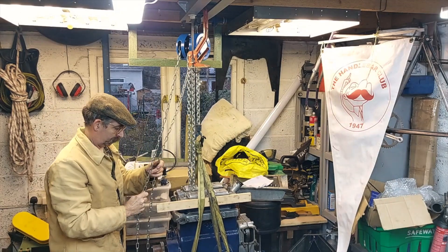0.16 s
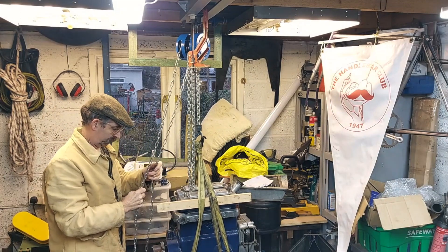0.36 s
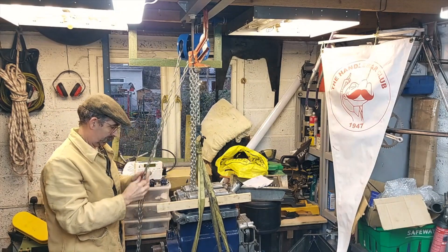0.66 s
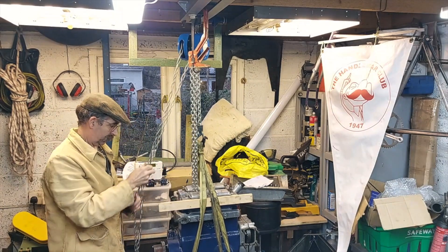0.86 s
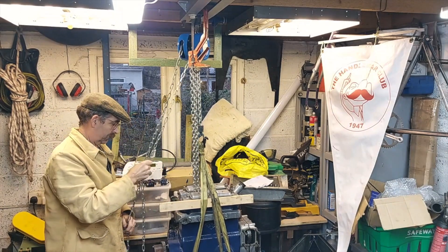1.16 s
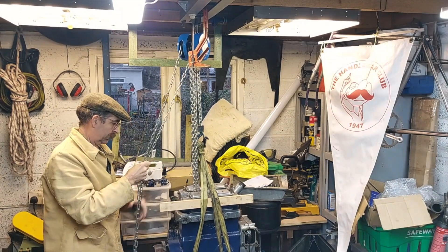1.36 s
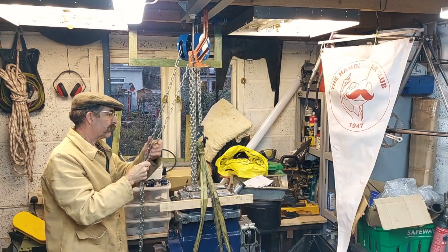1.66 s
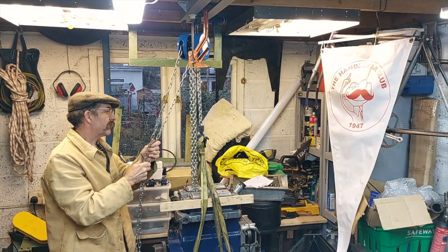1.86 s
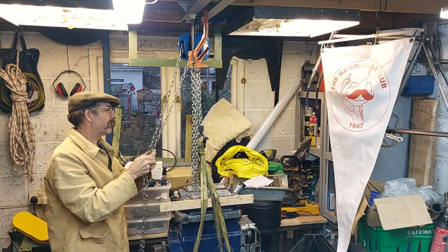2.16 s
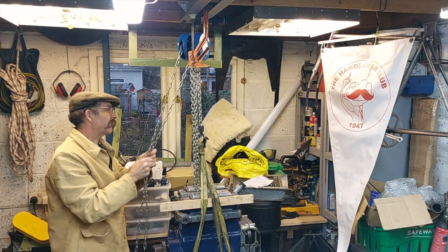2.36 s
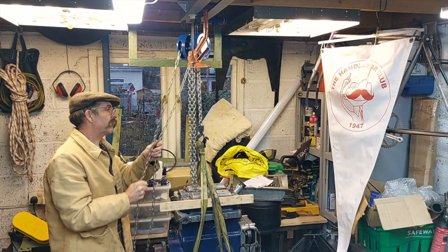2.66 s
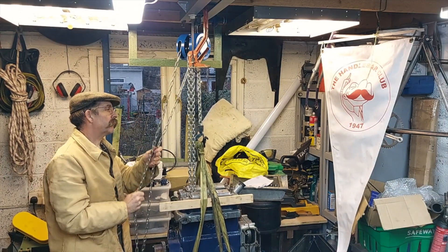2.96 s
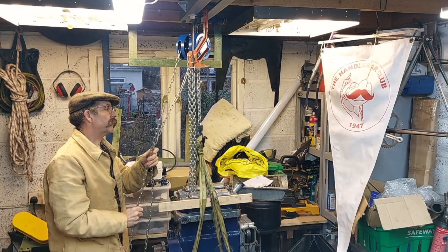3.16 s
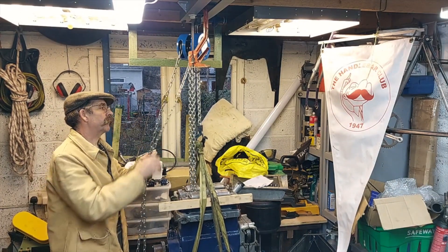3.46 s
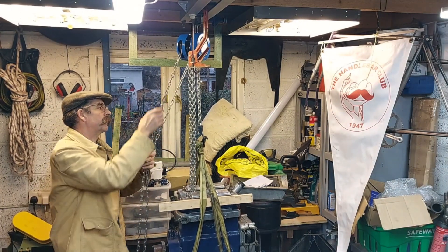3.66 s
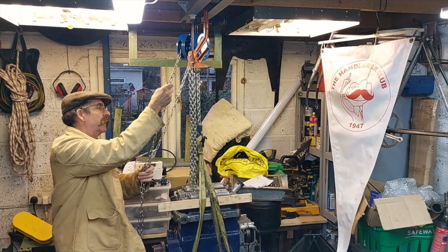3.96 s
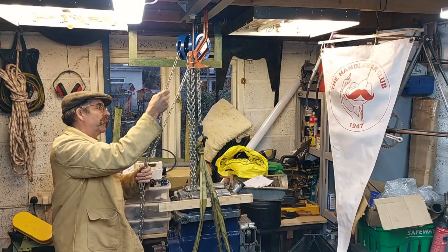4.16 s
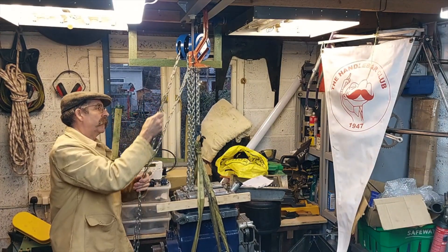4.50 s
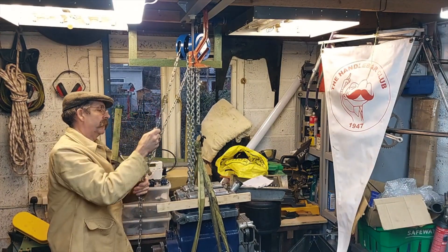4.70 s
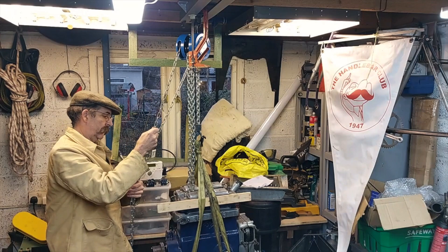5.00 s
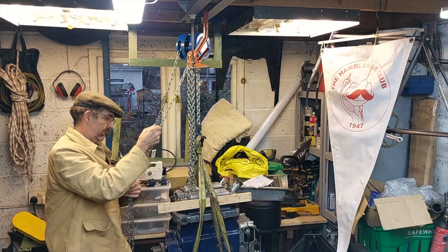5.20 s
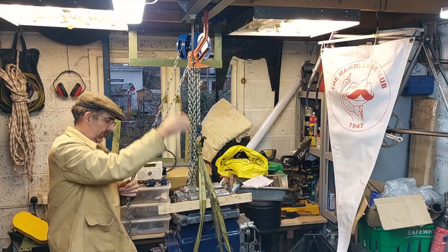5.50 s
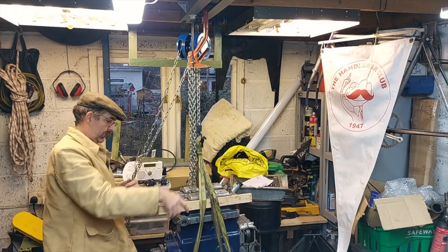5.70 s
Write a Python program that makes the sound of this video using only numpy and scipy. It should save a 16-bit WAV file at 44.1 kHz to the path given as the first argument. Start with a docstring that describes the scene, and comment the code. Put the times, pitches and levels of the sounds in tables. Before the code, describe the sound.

A hand chain is hauled through a hoist in a small garage, clattering and ratcheting in uneven bursts with metallic jingles and quiet gaps between.

```python
"""Chain hoist in a small garage

A hand chain is hauled through a chain hoist in a small, cluttered garage.
In each pull a pawl snaps over its ratchet while links knock on the wheel and its steel housing: these are
short bursts of noise sent through the ringing tones (modes) of the steel. Links rattle and ping; links and
sleeve or zip tick. Under this are the rumble of the beam, a shuffle, a rustling sleeve and still air, all
shaped noise. Delayed noise echoes give the room."""
import sys
import numpy as np
from scipy import signal
from scipy.fft import rfft, irfft
from scipy.io import wavfile
from scipy.ndimage import uniform_filter1d

SR = 44100
rng = np.random.default_rng(int(sys.argv[2]) if len(sys.argv) > 2 else 0)


def materialize(psi):
    """Save the field psi as 16-bit PCM at rate SR to the path in sys.argv[1].

    A 1-D psi becomes a single channel; in a 2-D psi each row is a channel.
    """
    bounded = np.clip(np.atleast_2d(psi).T, -1, 1)
    quanta = np.round(bounded * 32767).astype(np.int16)
    wavfile.write(sys.argv[1], SR, quanta)


N = 257544  # length in samples
TIME = np.arange(N) / SR
AGE = np.arange(SR // 4) / SR  # seconds since a blow
EDGE_HZ = 15750  # upper limit of the sound

# Levels in the tables are relative: each source also has an overall level of its own.
# Pulls that turn the wheel; a short tug moves it by one tooth:
# [start t/s, end t/s, pawl level/dB, rattle level/dB, beam level/dB]
PULLS = [(0.0004, 0.016, -5.5, -16.5, -26), (0.285, 0.305, -10, -24.5, -24.5),
         (0.659, 1.045, -10, -15.5, -28.5), (2.002, 2.001, -1.5, -6.5, -29),
         (2.398, 2.703, -4.5, -13.5, -32), (2.92, 3.098, -5, -12, -29), (4.1475, 4.196, -7.5, -21.5, -33),
         (4.2822, 4.712, -8, -19, -30.5)]
# Links that knock on the wheel or its guard: [t/s, clank level/dB, thud level/dB, jingle level/dB]
KNOCKS = [(0.001, -15.5, -20, -28), (0.076, -17.5, -43, -20), (0.111, -22, -57, -26.5),
          (0.275, -19, -36, -27.5), (0.29, -7, -41, -13), (0.463, -20.5, -62, -25.5),
          (0.497, -23, -48, -26), (0.555, -10, -18, -22), (0.586, -10.5, -44, -15.5),
          (0.605, -4.5, -47, -13.5), (0.663, -0.5, -11, -11), (0.698, -1, -12, -17.5),
          (0.738, -0.5, -12, -5.5), (0.784, -1.5, -12.5, -10), (0.823, -1.5, -40, -7),
          (0.864, -1.5, -9.5, -12), (0.9, -6.5, -39, -15), (0.942, -18, -45, -10), (0.964, -7.5, -27, -11),
          (0.981, -9, -31, -33), (1.014, -6, -20, -25), (1.044, -21, -13, -7), (1.065, -6, -11, -15),
          (1.181, -12.5, -30, -20), (1.29, -17.5, -58, -24.5), (1.4, -24.5, -44, -38.5),
          (1.472, -12, -33, -15.5), (1.552, -12, -37, -18.5), (1.571, -13.5, -39, -20.5),
          (1.648, -28, -27.5, -36.5), (1.906, -24, -30, -47), (1.96, -17.5, -20, -34),
          (1.995, -27, -18.5, -14.5), (2.045, -11, -17.5, -17.5), (2.071, -8, -15.5, -15.5),
          (2.139, -12.5, -27.5, -18.5), (2.31, -23, -30.5, -35.5), (2.376, -14.5, -31, -28),
          (2.418, -9, -11.5, -7), (2.453, -0.5, -12.5, -23), (2.516, -4.5, -13.5, -9.5),
          (2.573, -6, -36, -15), (2.634, -11, -12.5, -10), (2.68, -6, -18, -12.5), (2.779, -12.5, -31, -21),
          (2.857, -16.5, -69, -19.5), (2.924, -15, -19, -24), (2.955, -19, -36, -14),
          (2.97, -3.5, -35, -28), (2.986, -22, -23, -29), (3.023, -20, -34, -13), (3.042, -6, -11, -35),
          (3.076, -1.5, -17.5, -22), (3.178, -15, -45, -27.5), (3.229, -19.5, -41, -26),
          (3.26, -5.5, -28, -17.5), (3.281, -8, -17.5, -16), (3.349, -17, -44, -21.5),
          (3.386, -9, -36, -15), (3.57, -9.5, -18.5, -26.5), (3.633, -10.5, -25, -16),
          (3.821, -10.5, -29.5, -14.5), (3.86, -23, -31, -23.5), (3.9533, -21.5, -29.5, -47),
          (3.988, -33, -27, -40), (4.029, -12.5, -38, -22), (4.079, -15.5, -46, -30),
          (4.127, -12, -37, -21), (4.199, -6.5, -50, -10.5), (4.219, -10, -40, -10.5),
          (4.229, -9.5, -10, -34), (4.284, -8.5, -26, -12.5), (4.327, -8, -14, -37),
          (4.342, -8, -36, -10.5), (4.358, -6.5, -17, -21), (4.394, -23, -13, -20), (4.425, -2.5, -31, -12),
          (4.444, -16, -12, -13.5), (4.485, -3.5, -51, -17.5), (4.54, -6.5, -21, -17),
          (4.573, -5.5, -21, -9.5), (4.611, 0, -13.5, -13), (4.654, -9, -16, -16), (4.742, -7, -22.5, -18),
          (4.859, -17, -27.5, -21.5), (4.955, -47, -55, -32.5), (5.059, -19, -22, -28),
          (5.194, -24.5, -48, -33.5), (5.343, -26, -34, -31.5)]


def pawl(gather_s=0.007, uneven_s=0.001, uneven_db=1.66, uneven_top_db=3, teeth_per_s=22):
    """In each pull the pawl snaps down bright and hard on tooth after tooth; the wheel gathers a little speed."""
    # Tone colour of a snap: [f/Hz, level/dB]
    pawl_colour = [(300, -1), (1500, -2.5), (3000, -9), (5500, -6), (8000, -2), (11000, 0.5), (13500, -3.5),
                   (16000, -6)]
    out = np.zeros(N)
    for start, end, db, _, _ in PULLS:
        duration = end - start
        for progress in np.linspace(0, 1, 1 + round(abs(duration) * teeth_per_s)):
            late, harder, brighter = rng.uniform(-np.sqrt(3), np.sqrt(3), 3)
            tilt_db = uneven_top_db * brighter
            colour = causal([(hz, level + tilt_db * hz / EDGE_HZ) for hz, level in pawl_colour])
            snap = ring(contact(colour, rise=0.0016, fall=0.009), ring_db=3.5, link_db=-2.5)
            delay = (gather_s + uneven_s * late) * np.sin(np.pi * progress)  # most in mid-pull
            add(out, start + progress * duration + delay, amp(db + uneven_db * harder) * snap)
    return amp(-6.5) * out


def knocks(soft_top_hz=4000, hardening_hz=23000):
    """Links hit the housing: each blow is split into a low thud, a middle clank and a high jingle."""
    # Tone colour of a knock: [f/Hz, level/dB]
    knock_colour = [(100, -33), (260, -13.5), (390, -2.5), (620, -3), (1000, -1.5), (1700, -2),
                    (2050, -9.5), (3500, -12.5), (6000, -13.5), (9300, -15.5), (11000, -19.5), (13000, -14),
                    (16000, -40)]
    out, colour = np.zeros(N), causal(knock_colour)
    registers = [([750, 2200], "bandpass"), (750, "lowpass"), (2200, "highpass")]
    filters = [signal.butter(3, hz, kind, fs=SR, output="sos") for hz, kind in registers]
    for s, clank_db, thud_db, jingle_db in KNOCKS:
        seating_s = 0.00017 + 0.0037 * amp(clank_db)  # a link under load grinds for longer into its pocket
        blow = ring(contact(colour, rise=seating_s, fall=0.008), ring_db=2, link_db=6)
        # gentle touches are duller
        top_hz = np.clip(soft_top_hz + hardening_hz * np.sqrt(amp(jingle_db)), SR / 20, SR / 2 - 1)
        blow = signal.sosfilt(signal.butter(2, top_hz, fs=SR, output="sos"), blow)
        clank, thud, jingle = (unit_blow(signal.sosfilt(sos, blow)) for sos in filters)
        knock = amp(clank_db - 7.5) * clank + amp(thud_db) * thud + amp(jingle_db - 5) * jingle
        add(out, s, knock)
    return out


def rattle(per_s=380, spread_db=5.0, bright_db=-15):
    """Many small random touches between links: a dull mutter when slack, bright when the chain runs."""
    # Tone colour of a touch: [f/Hz, level/dB]
    rattle_colour = [(100, -23), (250, -4), (380, -0.5), (650, -0.5), (1000, -8), (1700, -7.5),
                     (2200, -10.5), (5000, -11.5), (10000, -19), (16000, -17)]
    # a faint mutter runs on its own and fades from 4.2 s
    vigour = amp(-36.5) * stroke(0, 4.2, attack_s=0.01, release_db_per_s=21)
    for start, end, db, _ in movements():
        movement = amp(db) * stroke(start, end, attack_s=0.0074, release_db_per_s=191)
        vigour = np.hypot(vigour, movement)
    # each knock leaves the neighbouring links shivering
    shiver_db, shiver_fade_db_per_s = -16.5, 205
    for s, clank_db, _, _ in KNOCKS:
        add(vigour, s, amp(clank_db + shiver_db - shiver_fade_db_per_s * AGE))

    happens = rng.random(N) < per_s / SR
    size = amp(spread_db * np.minimum(rng.exponential(1, N), 3))
    touches = happens * rng.choice([-1, 1], N) * size
    clink_count = 24  # each touch uses one of these clinks
    link, colour = rng.integers(0, clink_count, N), causal(rattle_colour)
    out = np.zeros(N)
    for k in range(clink_count):
        clink = ring(contact(colour, rise=0.00048, fall=0.0022), ring_db=-3, link_db=13)
        out += signal.oaconvolve(touches * (link == k), clink)[:N]
    out = evened(out)
    dull = signal.sosfilt(signal.butter(2, 1900, fs=SR, output="sos"), out)
    brightness = np.tanh(vigour / amp(bright_db))
    return amp(-8.0) * vigour * (dull + brightness * (out - dull))


def pings(swell_s=0.0048, width_hz=380):
    """Single links twist in their neighbours: a short scrape of noise drives one quickly damped tone."""
    # Pings: [t/s, level/dB, pitch f/Hz]
    ping_list = [(0.815, -13.5, 5250), (2.025, -19, 7200), (2.102, -24, 7100), (2.71, -22, 5424),
                 (3.036, -16.5, 5343), (3.043, -12.5, 7100), (4.138, -19.5, 5570), (4.308, -16.5, 5300)]
    out, age = np.zeros(N), AGE / swell_s
    for s, db, hz in ping_list:
        scrape = rng.standard_normal(len(AGE)) * age ** 2 * np.exp(-2 * age)
        link = np.exp(-np.pi * width_hz * AGE) * np.sin(2 * np.pi * hz * AGE)
        add(out, s, amp(db - 2.5) * unit_blow(signal.fftconvolve(scrape, link)))
    return out


def ticks():
    """Light, dry ticks of slack links, and thin, very high ticks of sleeve or zip: short bursts, no ringing."""
    # Ticks: [t/s, level/dB, brightest f/Hz]
    tick_list = [(0.438, -21, 9000), (1.434, -23, 9000), (2.258, -24.5, 4930), (1.817, -13, 2970),
                 (3.507, -8, 14100), (3.523, -15, 14000), (3.538, -8, 13700), (4.966, -16, 13000),
                 (5.045, -17, 5900), (5.301, -22, 11250), (5.418, -24, 6950), (5.724, -22, 11050)]
    out = np.zeros(N)
    for s, db, hz in tick_list:
        colour = causal([(hz / 10, -24), (hz / 2, -13), (hz, 0), (hz * 2, -9), (hz * 10, -35)])
        add(out, s, amp(db - 24.5) * contact(colour, rise=0.00061, fall=0.003))
    return out


def beam():
    """Each movement shakes the beam: its low rumble builds while the chain moves and dies away afterwards."""
    # Tone colour of the rumble: [f/Hz, level/dB]
    beam_colour = [(20, -40), (42, -15), (55, -13.5), (64, 9.5), (76, -6), (95, 2.5), (108, -9.5),
                   (124, -3.5), (150, -6), (220, -9), (400, -21), (700, -54), (3000, -78)]
    shaking = amp(-51)  # never quite still
    for start, end, _, db in movements():
        envelope = stroke(start, end, attack_s=0.0087, release_db_per_s=110, build_db_per_s=18.5)
        shaking = np.hypot(shaking, amp(db) * envelope)
    shake = tinted(rng.standard_normal(N), beam_colour)
    # dividing by the running strength keeps the noise steady
    strength = np.sqrt(uniform_filter1d(shake ** 2, size=4000) + 1e-9)
    return amp(-1.9) * shaking * shake / strength


def shuffle():
    """A soft, low scuff of noise after the last pull, as the hand lets go and the chain swings out."""
    # Tone colour of the scuff: [f/Hz, level/dB]
    shuffle_colour = [(40, -6), (140, 1), (300, -6), (420, 1.5), (560, -12.5), (1000, -18), (3000, -51),
                      (16000, -77)]
    level = amp(-37) * stroke(5.06, 5.48, attack_s=0.011, release_db_per_s=84)
    return level * tinted(rng.standard_normal(N), shuffle_colour)


def rustle(grain_db=4):
    """The coat sleeve rustles as the arm reaches for a new grip: friction noise in small clumps."""
    # Reaches of the arm: [start t/s, end t/s, level/dB]
    reaches = [(3.453, 3.625, -28), (3.74, 3.865, -34), (5.124, 5.75, -47.5)]
    # Tone colour of the cloth: [f/Hz, level/dB]
    rustle_colour = [(200, 12), (1000, 9), (3000, 4), (7000, -2.5), (12000, -6), (15500, 3.5)]
    level = sum(amp(db) * stroke(start, end, attack_s=0.14, release_db_per_s=143) for start, end, db in reaches)
    slow_noise = evened(uniform_filter1d(rng.standard_normal(N), size=150))
    clumps = evened(amp(grain_db * slow_noise))
    return level * tinted(clumps * rng.standard_normal(N), rustle_colour)


def still_air():
    """The still air of the garage: steady, quiet, mostly low noise."""
    # Tone colour of the air: [f/Hz, level/dB]
    air_colour = [(30, -30), (90, -9.5), (400, -13.5), (700, -11.5), (1200, -19.5), (3000, -30.5),
                  (8000, -35.5), (13000, -37), (15500, -31)]
    return amp(-46) * tinted(rng.standard_normal(N), air_colour)


def garage(x, turns_per_s=3.3, count=4):
    """The room's echoes pass smoothly among four random sets of reflections, so that no tone hangs on."""
    turn = turns_per_s * TIME - np.arange(count)[:, None] / count
    weights = np.maximum(np.cos(2 * np.pi * turn), 0)
    return sum(signal.fftconvolve(x * weight, room_tail())[:N] for weight in weights)


def room_tail():
    """Dense reflections from near walls and shelves, each pitch range dying at its own speed."""
    # Time for the echoes to drop by 60 dB: [f/Hz, t/s]
    decay_times = [(100, 0.23), (500, 0.23), (1400, 0.17), (4000, 0.17), (10000, 0.13), (16000, 0.15)]
    taps = rng.standard_normal(SR // 2) * (rng.random(SR // 2) < 3000 / SR)
    taps[:round(.004 * SR)] = 0  # the first echo needs time to return
    hz, t, z = signal.stft(taps, SR, nperseg=256)
    fade = amp(-60 * t / read(decay_times, hz)[:, None])
    tail = signal.istft(z * fade, SR, nperseg=256)[1]
    return tail / np.linalg.norm(tail)


def movements():
    """Lists every pull and swing as (start s, end s, rattle dB, beam dB)."""
    # The slack chain swings or slides through the hand: [start t/s, end t/s, rattle level/dB, beam level/dB]
    swings = [(0.132, 0.27, -29, -50), (0.544, 0.65, -18, -36), (1.024, 1.032, -13.5, -24),
              (1.176, 1.212, -21.5, -33.5), (1.643, 1.784, -34, -59), (1.965, 2.127, -22, -37.5),
              (2.304, 2.399, -25, -43), (2.716, 2.825, -23, -36), (3.235, 3.48, -23, -35),
              (3.52, 3.78, -28.5, -39.5), (4.023, 4.138, -20, -32), (5.17, 5.3, -59, -31.5),
              (5.305, 5.43, -34.5, -28.5)]
    return [(start, end, rattle_db, beam_db) for start, end, _, rattle_db, beam_db in PULLS] + swings


def stroke(start, end, attack_s, release_db_per_s, build_db_per_s=0):
    """The loudness curve of one movement: it sets in, holds or builds, and dies away after its end."""
    onset = np.clip((TIME - start) / attack_s, 0, 1)
    held = np.clip(TIME - start, 0, abs(end - start))
    after = np.maximum(TIME - end, 0)
    return onset * amp(build_db_per_s * held - release_db_per_s * after)


def contact(colour, rise, fall):
    """A light or hard contact: a burst of noise that swells and dies in milliseconds (rise and fall in s)."""
    envelope = (1 - np.exp(-AGE / rise)) * np.exp(-AGE / fall)
    burst = rng.standard_normal(len(AGE)) * envelope
    return unit_blow(signal.fftconvolve(burst, colour)[:len(AGE)])


def ring(blow, ring_db, link_db, scatter_db=3, link_width_hz=90, link_scatter_db=4):
    """A blow rings the modes of the hoist and eight of the link that struck, which differ every time."""
    # Modes of housing, wheel and ratchet; wider ones die sooner.
    # [f/Hz, width f/Hz, level/dB above the plain impact, before ring_db and scatter]
    housing = [(376, 22, 7), (465, 45, 7.5), (660, 35, 9), (778, 40, 4), (905, 50, 6), (987, 40, 12),
               (1200, 40, 6), (1601, 55, 10), (1735, 80, 5), (2375, 40, 10), (3315, 70, 12), (3910, 90, 9),
               (4750, 140, 7), (5480, 100, 5), (5740, 75, 5), (6445, 40, 10), (6797, 42, 11), (7400, 60, 4),
               (7835, 110, 5), (8550, 65, 12), (9600, 75, 6), (10080, 45, 7), (10880, 130, 7),
               (11150, 130, 5), (11800, 90, 3), (12500, 90, 4), (13520, 55, 7)]
    link_hz = np.geomspace(900, 12000, 8) * 2 ** rng.uniform(-.27, .27, 8)
    link_levels = link_db + link_scatter_db * rng.uniform(-0.8, 1, len(link_hz))
    link_widths = link_width_hz * np.sqrt(link_hz / link_hz[1])
    modes = housing + list(zip(link_hz, link_widths, link_levels))
    hz, width, db = np.transpose(modes)[:, :, None]
    share = (amp(db) - 1) * amp(ring_db + scatter_db * rng.standard_normal(hz.shape))
    age = AGE[:len(AGE) // 2]
    decay = 2 * np.pi * width / SR * np.exp(-np.pi * width * age)
    response = (share * decay * np.cos(2 * np.pi * hz * age)).sum(0)
    return unit_blow(blow + signal.fftconvolve(blow, response)[:len(blow)])


def causal(points, size=1024):
    """Turns a tone colour into the most prompt filter that has it (minimum phase)."""
    log_gain = np.log(amp(read(points, abs(np.fft.fftfreq(size, 1 / SR)))))
    return np.fft.ifft(np.exp(np.conj(signal.hilbert(log_gain)))).real[:size // 2]


def tinted(x, points):
    """Filters a long sound by a tone colour and scales it to rms 1."""
    gain = amp(read(points, np.fft.rfftfreq(N, 1 / SR)))
    return evened(irfft(rfft(x) * gain, N))


def read(points, hz):
    """Reads a table between its points along a log-frequency axis."""
    f, value = np.transpose(points)
    return np.interp(np.log(hz + 1), np.log(f + 1), value)


def amp(db):
    """Turns decibels into a gain."""
    return 10 ** (np.asarray(db) / 20)


def evened(x):
    """Scales a sound to rms 1."""
    return x / np.sqrt(np.mean(x ** 2) + 1e-20)


def unit_blow(x):
    """Scales a blow to the energy of 10 ms at rms 1."""
    return x / np.sqrt(np.sum(x ** 2) / (SR / 100) + 1e-20)


def add(mix, s, sound):
    """Mixes a sound in at time s, in seconds."""
    part = mix[max(round(s * SR), 0):][:len(sound)]
    part += sound[:len(part)]


def scene():
    """Adds up the hoist, the person hauling, the room and the still air."""
    snaps = pawl() + pings()
    chain = knocks() + rattle()
    room = garage(amp(-8.5) * snaps + amp(-4.0) * chain)
    direct = snaps + chain + ticks() + beam()
    return (direct + room + shuffle() + rustle() + still_air())[None]


def record(dry):
    """The microphone drops the deepest bass, peaks round off towards full scale, then the top is cut."""
    heard = signal.sosfilt(signal.butter(3, 38, "highpass", fs=SR, output="sos"), dry)
    held = heard / (1 + heard ** 6) ** (1 / 6)
    low_pass = signal.firwin(401, EDGE_HZ, window=("kaiser", 8), fs=SR)
    return signal.oaconvolve(held, low_pass[None], "same")


dry = scene()
out = record(dry)
materialize(out)
```